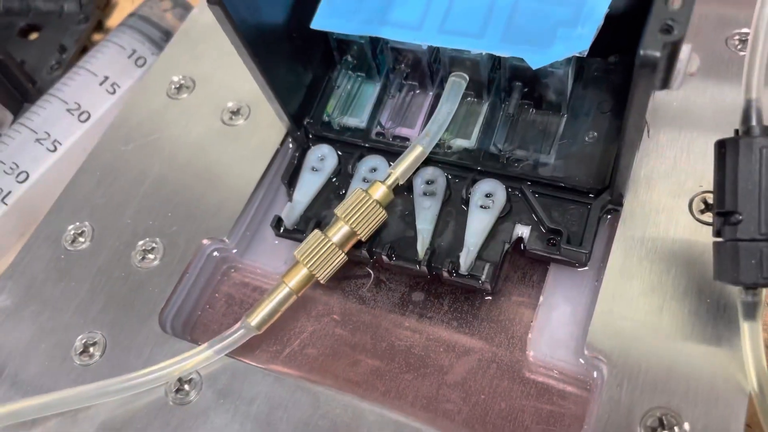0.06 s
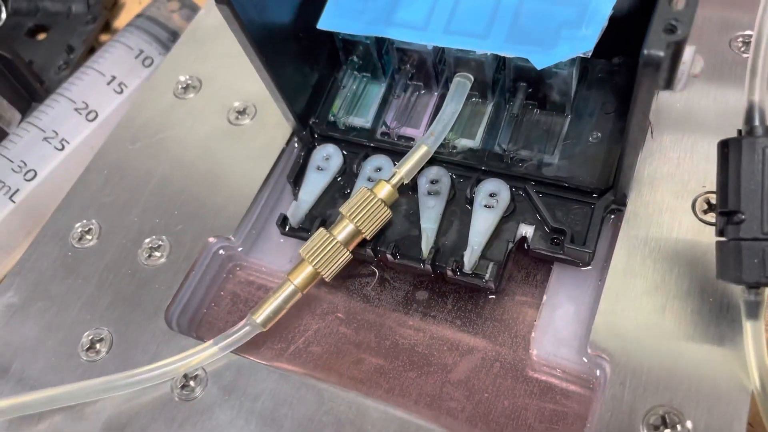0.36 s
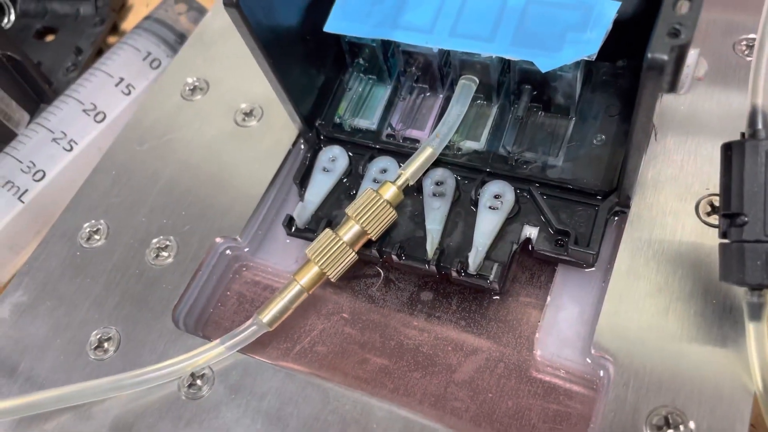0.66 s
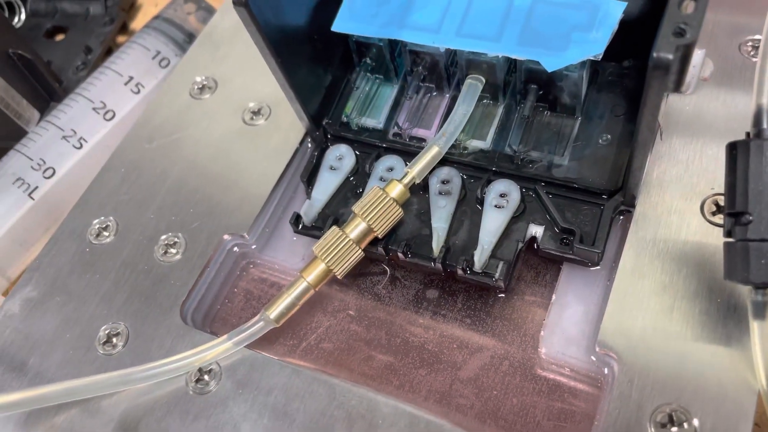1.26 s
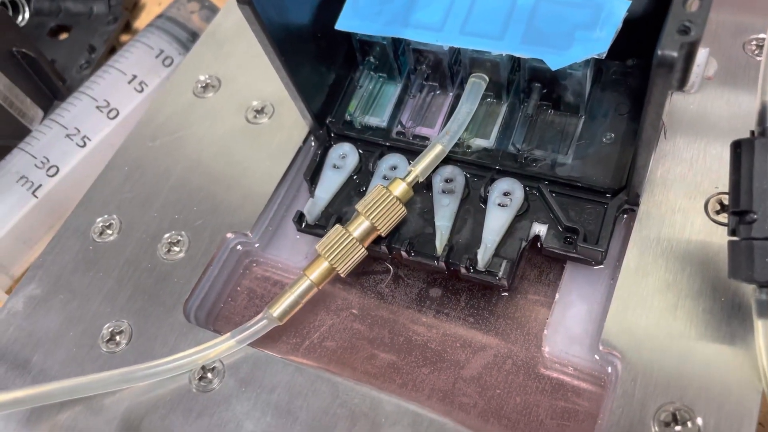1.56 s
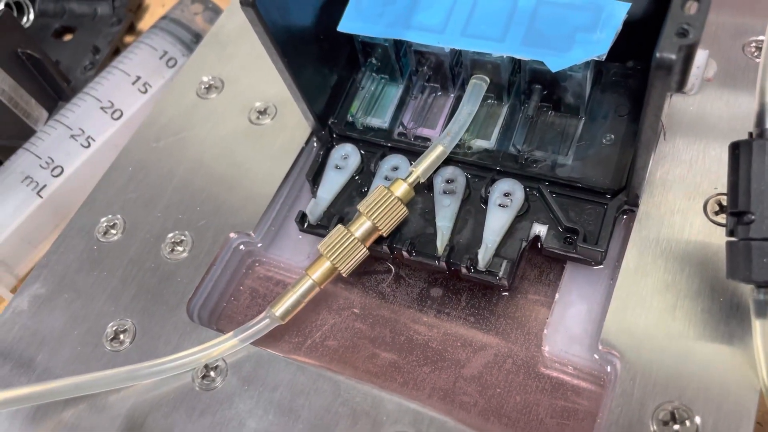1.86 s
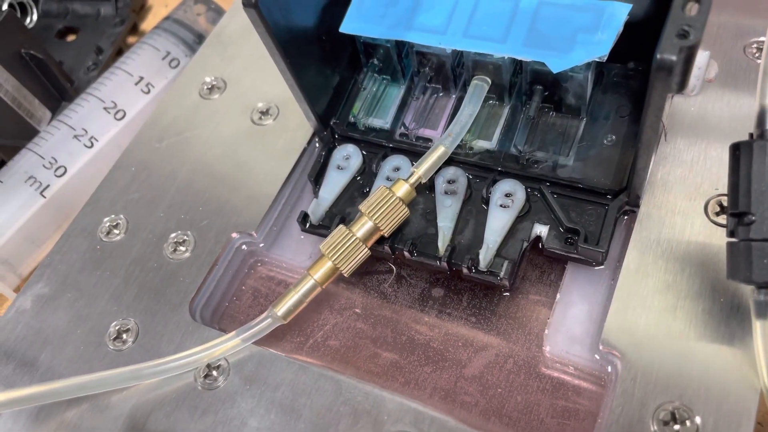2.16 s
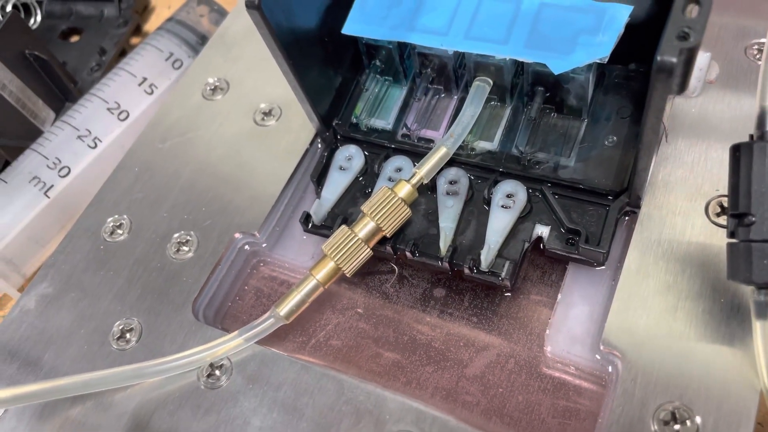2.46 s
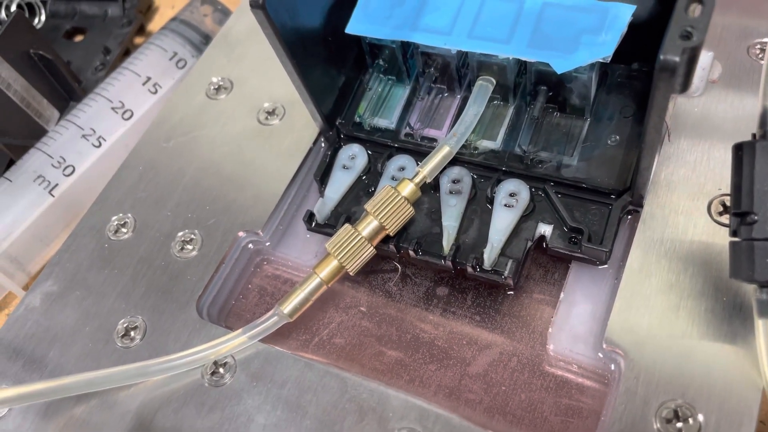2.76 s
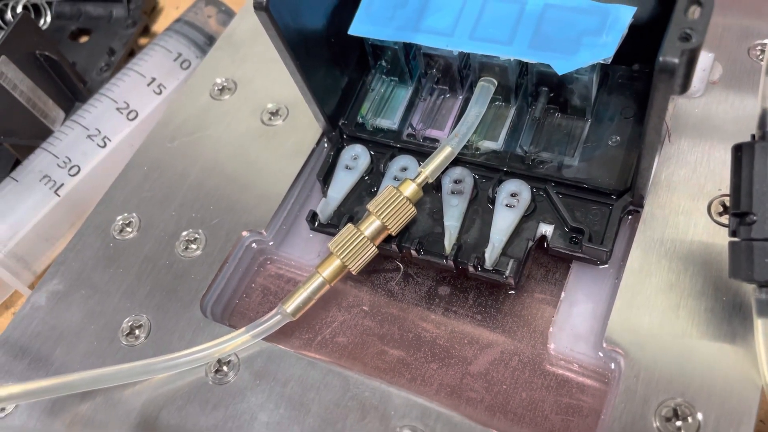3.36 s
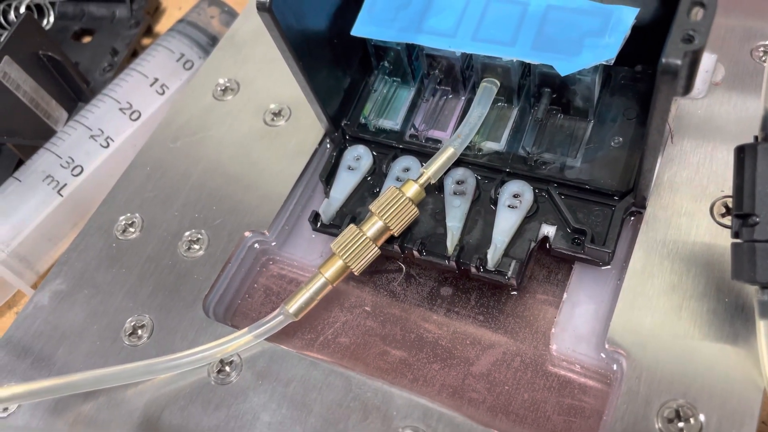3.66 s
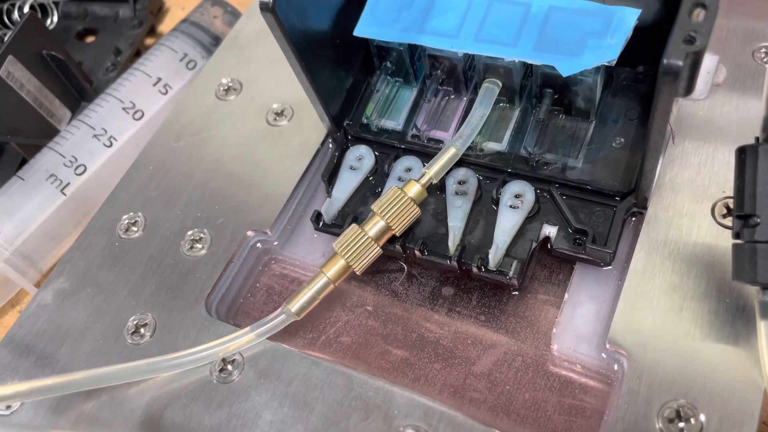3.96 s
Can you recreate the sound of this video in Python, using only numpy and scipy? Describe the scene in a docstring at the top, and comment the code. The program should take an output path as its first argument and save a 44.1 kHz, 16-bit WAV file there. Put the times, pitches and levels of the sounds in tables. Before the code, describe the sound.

A small pump ticking sharply about four times a second over motor hum and fan noise.

```python
"""A small motor-driven pump ticks about four times a second, close to a phone in a workshop.
Each stroke is a short stick-slip scrape that grows and brightens, then a sharp snap; both ring the
same housing and echo off a metal deck and a dull room. One faint, high squeak sounds early on.
The motor hums until it stops near the end, so the last stroke only scrapes and the mechanism creaks
to rest. Fans and room rumble carry on."""
import sys
import numpy as np
from scipy import signal
from scipy.fft import rfft, irfft
from scipy.io import wavfile
from scipy.ndimage import uniform_filter1d

SR = 44100
rng = np.random.default_rng(int(sys.argv[2]) if len(sys.argv) > 2 else 0)


def wav_record(signal):
    """Record a signal, one row per channel, as 16-bit PCM in the file named by sys.argv[1]."""
    frames = np.transpose(np.atleast_2d(signal))
    bounded = np.clip(frames, -1, 1)
    # unit amplitude maps onto the largest positive 16-bit level
    quanta = np.round(bounded * 32767).astype(np.int16)
    wavfile.write(sys.argv[1], SR, quanta)


N = 176400

# The pump's rhythm. Each row: time the snap is due in seconds, snap trim in dB, scrape trim in dB,
# scrape length in seconds.
STROKES = [(0.1445, 3, -1.3, 0.021), (0.378, 1.5, -1.5, 0.018), (0.6119, 1.5, 0.4, 0.022),
           (.8436, 3, -1.5, 0.023), (1.0775, 0.2, -3, 0.019), (1.3112, 1.1, -0.5, 0.021),
           (1.5434, 3, -1.1, 0.023), (1.7762, 0.5, -3, 0.021), (2.0104, 2, -1.5, 0.023),
           (2.2427, 3, -2, 0.021), (2.4756, 2, -3.5, 0.022), (2.7101, 1.8, -2.3, 0.022),
           (2.9426, 3, -1.5, .023), (3.176, 0.4, -5, 0.026), (3.409, 2.5, -0.1, 0.02),
           (3.6415, 0, -3.3, .024)]
MOTOR_STOP_S = 3.59  # before the last stroke can snap
SIDE = np.array([[1], [-1]])  # opposite signs for left and right


def undb(db):
    """Decibels to gain."""
    return 10 ** (np.asarray(db) / 20)


def curve(points, hz):
    """Read a table on a log-frequency axis."""
    knots_hz, values = np.array(points, float).T
    return np.interp(np.log(np.maximum(hz, 1)), np.log(knots_hz), values)


def add(track, start_s, sound):
    """Mix a sound into a track."""
    i = int(round(start_s * SR))
    track[..., i:i + sound.shape[-1]] += sound[..., :max(N - i, 0)]


def drift(per_s):
    """Smooth random wander with a spread near 1."""
    hold = int(SR / per_s)
    steps = np.repeat(rng.standard_normal(N // hold + 1), hold)
    return 1.3 * uniform_filter1d(uniform_filter1d(steps, hold), hold)[:N]


def filtered(sound, hz, kind="low", order=2):
    """Butterworth filter, low-pass by default."""
    return signal.sosfilt(signal.butter(order, hz, kind, fs=SR, output="sos"), sound)


def sine(hz):
    """A sine that follows a pitch curve."""
    return np.sin(2 * np.pi * np.cumsum(hz) / SR)


def mode(hz, t60_s):
    """Ring of one mode, with gain 1 at its centre."""
    t, decay = np.arange(SR // 8) / SR, np.log(1000) / t60_s
    return 2 * decay / SR * np.exp(-decay * t) * np.sin(2 * np.pi * hz * t)


def reflections(sound, t60_s):
    """Diffuse echoes: a dying noise tail of unit energy."""
    t = np.arange(SR // 2) / SR
    tail = rng.standard_normal(len(t)) * np.exp(-np.log(1000) * t / t60_s)
    return signal.fftconvolve(sound, tail / np.sqrt(np.sum(tail ** 2)))[:N]


def fans():
    """The bed: rumble and air noise through narrow resonances, with wavering fan and mains tones."""
    # Colour of the fans and room. Each row: frequency in Hz, noise density in dB per Hz.
    air_spectrum = [(20, -109), (31, -86), (42, -76), (56, -62.5), (75, -69.5), (105, -61), (133, -74),
                    (155, -65), (250, -67.5), (340, -72.5), (480, -80.5), (900, -78.5), (1220, -82.5),
                    (1500, -80), (1950, -85), (2300, -91.5), (3700, -95), (5500, -94), (7000, -100.5),
                    (7800, -106), (9000, -106.5), (11500, -111.5), (13000, -118), (16000, -119)]
    # The machine's air resonances. Each row: centre in Hz, width in Hz, lift in dB.
    ducts = [(543.2, 41, 13.5), (2620, 103, 7), (2850, 31, 5), (3630, 120, 0.5), (4190, 50, 5),
             (4350, 44, 7.5), (5570, 37, 6.5)]
    # How diffuse the air is. Each row: frequency in Hz, side minus mid in dB.
    air_width = [(60, -20.5), (350, -14), (550, 5), (1150, -5), (1650, -13.5), (2400, -4.5), (5300, -6),
                 (6100, 3), (7200, -32), (9200, -51), (10500, -4), (15000, -31)]
    # Fan and mains tones. Each row: pitch in Hz, rms level in dB, waver as a share of the pitch.
    fan_tones = [(58.5, -50, 0.0083), (543.4, -54.5, 0.00401), (700, -68, 0.0019), (1100, -58, 0.0033),
                 (1388, -69.5, 0.00318), (1630, -71, 0.0029)]
    hz = np.arange(N // 2 + 1) * SR / N
    duct_db = sum(lift / (1 + (2 * (hz - centre) / width) ** 2) for centre, width, lift in ducts)
    mid, side = rfft(rng.standard_normal((2, N)))
    spread = undb(curve(air_width, hz))
    colour = undb(curve(air_spectrum, hz) + duct_db) * np.sqrt(SR / 2 / (1 + spread ** 2))
    air = irfft(colour * (mid + spread * side * SIDE), N)
    tones = np.zeros(N)
    for pitch_hz, db, waver in fan_tones:
        level = undb(db + drift(11))  # flutters by about 1 dB
        tones += level * np.sqrt(2) * sine(pitch_hz * (1 + waver * drift(14)))
    return air * undb(0.5 * drift(8.65)) + tones


def squeak():
    """One faint, very high squeak that arches up and down."""
    length_s, base_hz, arch_hz = 0.11, 12100, 450
    arch = np.sin(np.linspace(0, np.pi, int(length_s * SR)))
    out = np.zeros(N)
    add(out, start_s=0.17, sound=undb(-72) * arch * sine(base_hz + arch_hz * arch))
    return out


def motor():
    """The motor's hum swells and bends with each stroke's load, and its mount shakes, until it stops."""
    # The load over one stroke. Each row: seconds from the snap, swell in dB, pitch bend in Hz.
    load_cycle = [(-.118, 1.1, 0.5), (-.09, -0.2, 5.5), (-.05, 2.5, -1.1), (-.02, -2, -1), (.005, -1, -1.5),
                  (.02, -0.2, -4.5), (.075, -0.6, 0)]
    hum_hz, hum_db, rattle_db, fade_s = 285.5, -42, -53, 0.015
    t = np.arange(N) / SR
    snaps_s = np.array(STROKES)[:, 0]
    period_s = np.mean(np.diff(snaps_s))
    when, swells, bends = np.array(load_cycle).T
    swell_db = np.interp(t - snaps_s[0], when, swells, period=period_s)
    bend_hz = np.interp(t - snaps_s[0], when, bends, period=period_s)
    pitch_hz = hum_hz * (1 + 0.00056 * drift(12.8)) + bend_hz - np.mean(bend_hz)
    hum = undb(hum_db + swell_db + 0.25 * drift(16)) * np.sqrt(2) * sine(pitch_hz)
    rattle = signal.fftconvolve(rng.standard_normal(N), mode(hz=273.8, t60_s=0.18))[:N]
    running = np.clip((MOTOR_STOP_S - t) / fade_s + 0.5, 0, 1)
    return running * (hum + undb(rattle_db) * rattle / np.std(rattle))


def housing(scraped):
    """The housing's ring for one contact, a little different every time."""
    # Its modes. Each row: pitch in Hz, T60 in seconds, level in dB when snapped, and when scraped.
    modes = [(573, 0.016, -14.5, -5.5), (885, 0.032, -7.5, 0.5), (1636, 0.027, 1, 5.5),
             (1961, 0.022, -7.5, -2), (2167, 0.022, -8, -10.5), (2575, 0.012, -4, -10.5),
             (2902, 0.029, -5, -2), (3116, 0.013, -8, -8), (3700, 0.0095, -18, -9),
             (4200, 0.013, -15, -8.5), (4966, 0.013, -19, -12.5), (5390, 0.0068, -14.5, -19.5),
             (6800, 0.0046, -28.5, -21.5), (8284, 0.012, -14, -21.5), (10020, 0.0012, -35, -21.5),
             (10780, 0.0055, -23.5, -23), (11330, 0.0089, -38, -27), (12300, 0.0037, -29, -51),
             (14200, .003, -30, -36), (15500, .003, -33, -42)]
    scatter_db, detune = 0.57, 0.0043
    ring = 0
    for k, (hz, t60_s, snapped_db, scraped_db) in enumerate(modes):
        level = undb((scraped_db if scraped else snapped_db) + scatter_db * rng.standard_normal())
        ring += (-1) ** k * level * mode(hz * (1 + detune * rng.standard_normal()), t60_s)
    return ring


def scrape(length_s, rise_db, ring):
    """Stick-slip grains grow and brighten as the load builds, and die away as it lets go."""
    grains_per_s, grain_spread_db = 2400, 3
    attack_s, release_s = 0.13 * length_s, 0.0075
    treble_hz, brighten_db = 6100, 12
    t = np.arange(SR // 16) / SR
    slips = rng.random(len(t)) < grains_per_s / SR
    grains = slips * undb(grain_spread_db * rng.standard_normal(len(t))) * rng.choice([-1, 1], len(t))
    slack = np.maximum(1 - t / length_s, 0)
    release = np.clip(1 - (t - length_s) / release_s, 0, 1)
    load = undb(-rise_db * slack) * np.minimum(t / attack_s, 1) * release
    grip = undb(-1.5 * drift(per_s=294)[:len(t)])  # the grip comes and goes
    body = signal.sosfiltfilt(signal.butter(2, treble_hz, fs=SR, output="sos"), grains)
    treble = (grains - body) * undb(-brighten_db * slack)
    rub = signal.fftconvolve((body + treble) * load * grip, ring)
    rub = filtered(rub, hz=13700, order=6)  # rubbing is softer than a snap
    return rub / np.sqrt(np.sum(rub ** 2) / (length_s * SR) + 1e-18)


def glide():
    """Once the scrape lets go, the part slides on with a thin, fading hiss."""
    length_s, centre_hz = 0.045, 9000
    n = int(length_s * SR)
    hiss = filtered(rng.standard_normal(n), [centre_hz / 1.3, centre_hz * 1.3], "band")
    return undb(-68.5) * hiss / np.std(hiss) * np.sqrt(np.linspace(1, 0, n))


def snap(ring):
    """One hard contact, a brief treble chatter, and a weak, soft rebound."""
    chatter_db, chatter_decay_s = -6.5, 0.0025
    rebound_db, rebound_width_s = -17, 0.00007
    t = np.arange(SR // 100) / SR
    burst = rng.standard_normal(len(t)) * np.exp(-t / chatter_decay_s)
    chatter = filtered(burst, hz=4550, kind="high")
    force = (t == 0) + undb(chatter_db) * chatter / np.sqrt(np.sum(chatter ** 2))
    rebound_s = 0.00345 * (1 + 0.158 * rng.standard_normal())
    rebound = np.exp(-((t - rebound_s) / rebound_width_s) ** 2)
    force += undb(rebound_db) * rebound / (np.sum(rebound) + 1e-18)
    return signal.fftconvolve(force, ring)


def pump():
    """Each full stroke scrapes, glides, slips, snaps and settles; some scrapes catch on the way."""
    # Harder catches within a scrape. Each row: start in seconds, level in dB.
    catches = [(.5322, -2.5), (1.2305, -6), (1.6997, -5), (3.0992, -3), (3.563, -2.5)]
    scrape_db, slip_db, snap_db, settle_db = -37.5, -49.5, 2.5, -27
    scrape_lead_s, slip_s, settle_lag_s = 0.0645, 0.0075, 0.09
    out = np.zeros(N)
    for snap_s, snap_trim_db, scrape_trim_db, length_s in STROKES:
        let_go_s = snap_s - scrape_lead_s
        rub = scrape(length_s, rise_db=4, ring=housing(scraped=True))
        add(out, let_go_s - length_s, undb(scrape_db + scrape_trim_db) * rub)
        if snap_s < MOTOR_STOP_S:
            ring = housing(scraped=False)
            add(out, let_go_s, glide())
            add(out, snap_s - slip_s, undb(slip_db) * scrape(slip_s, rise_db=0, ring=ring))
            add(out, snap_s, undb(snap_db + snap_trim_db) * snap(ring))
            tick = undb(settle_db + 2 * rng.standard_normal()) * mode(hz=8600, t60_s=0.008)
            add(out, snap_s + settle_lag_s, tick)
    for start_s, db in catches:
        add(out, start_s, undb(db) * filtered(housing(scraped=True), hz=4520))  # a soft contact
    creak = scrape(length_s=0.0037, rise_db=0, ring=housing(scraped=False))
    add(out, start_s=3.692, sound=undb(-49) * creak)  # the mechanism comes to rest
    return out


def scene():
    """The pump and its echoes off the metal deck and the room, over motor, fans and squeak."""
    ticks = pump()
    deck = undb(-14) * reflections(ticks, t60_s=0.0098) * SIDE
    dulled = filtered(ticks, hz=4070)  # the room swallows the treble
    room = undb(-9) * np.array([reflections(dulled, t60_s=0.14) for _ in range(2)])
    return ticks + deck + room + motor() + fans() + squeak()


def record(dry):
    """The phone's two microphone ports differ in phase and level; the top is cut at 16 kHz."""
    # Phase between the ports. Each row: frequency in Hz, the left's lead in radians.
    port_phase = [(20, 0), (420, 0), (700, 1.2), (900, -.8), (1120, -1.9), (1400, -.2), (2200, 0),
                  (3700, .6), (5800, -.1), (6500, -2.1), (7150, -2.6), (8000, -2.7), (8400, -3.8),
                  (8900, -4.4), (10000, -6.1), (12000, -6.4), (13400, -9.2), (16000, -9.5)]
    # Balance between the ports. Each row: frequency in Hz, left minus right in dB.
    port_balance = [(60, -.3), (300, -.6), (570, -1.5), (700, 2), (880, 11), (1200, -.5), (1450, 2),
                    (3000, .7), (3800, 4), (5000, .3), (6200, 1.5), (7000, 0)]
    hz = np.arange(N // 2 + 1) * SR / N
    gain = undb(SIDE * curve(port_balance, hz) / 2)
    gain /= np.sqrt(np.mean(gain ** 2, axis=0))
    phase = SIDE * curve(port_phase, hz) / 2
    heard = irfft(rfft(dry) * gain * np.exp(1j * phase), N)
    return signal.sosfilt(signal.ellip(8, 0.2, 70, 16000, fs=SR, output="sos"), heard)


dry = scene()
out = record(dry)
wav_record(out)
```